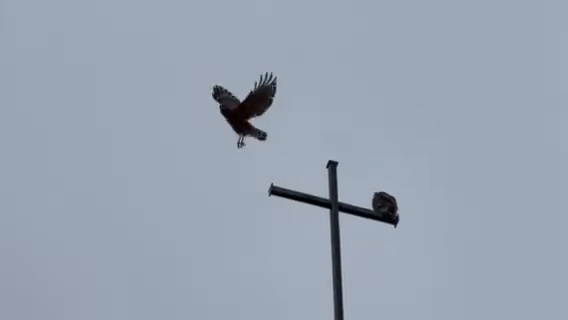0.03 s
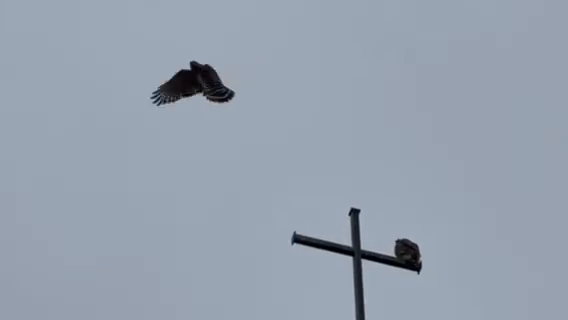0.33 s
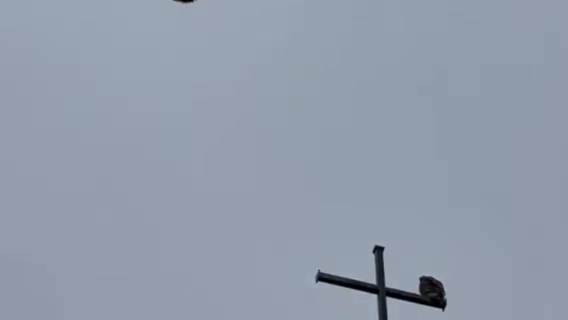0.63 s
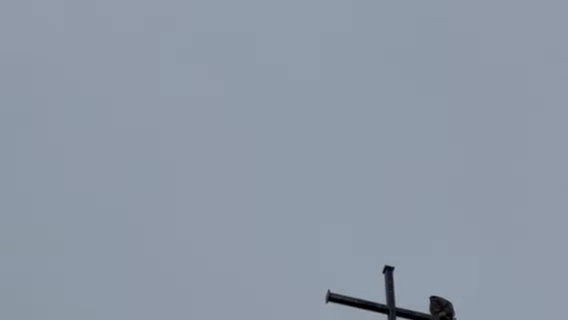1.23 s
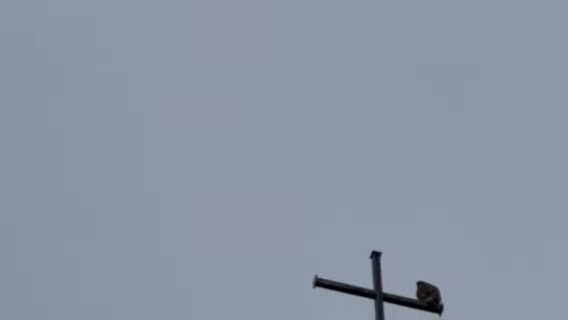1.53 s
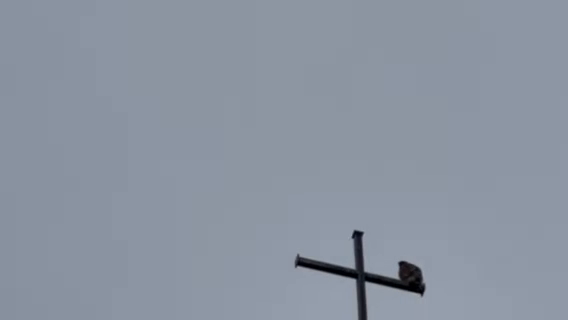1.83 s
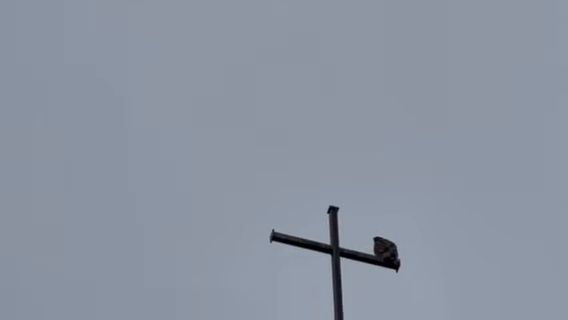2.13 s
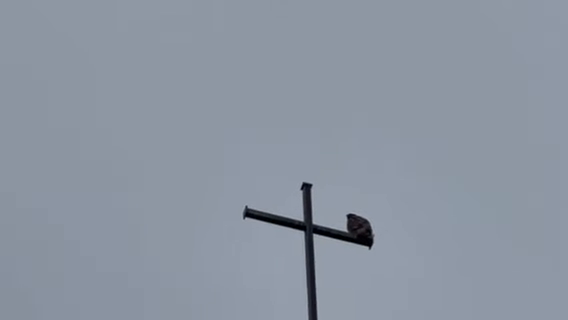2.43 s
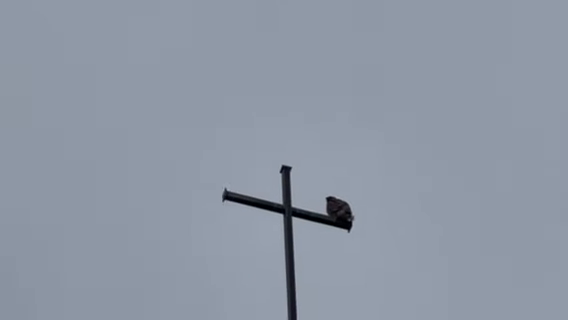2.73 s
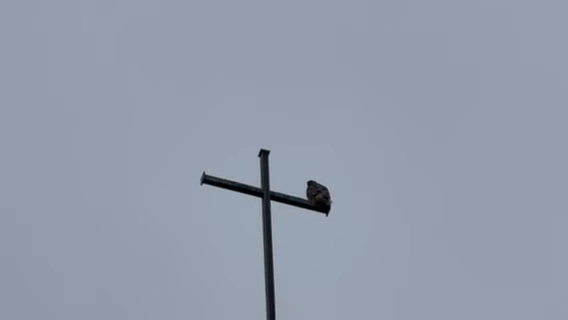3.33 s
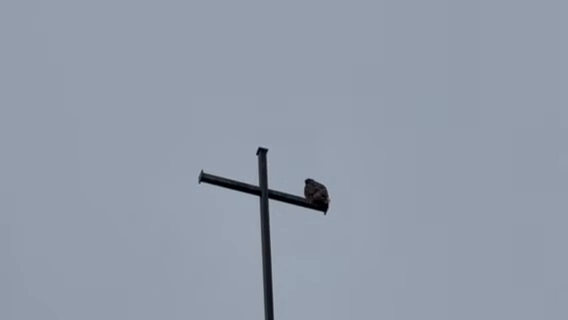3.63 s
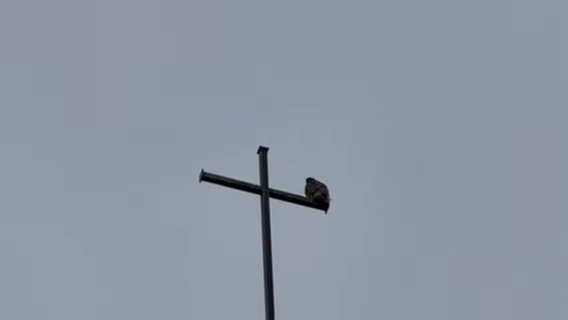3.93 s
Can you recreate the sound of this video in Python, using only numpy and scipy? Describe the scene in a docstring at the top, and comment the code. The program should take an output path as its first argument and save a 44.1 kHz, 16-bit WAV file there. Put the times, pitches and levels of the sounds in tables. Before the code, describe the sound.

Outdoors near a road, a hawk lets out one short, raspy, descending cry. Afterwards gusts buffet the microphone and a few faint chirps sound, while the low hum of traffic grows as a car passes.

```python
"""Outdoors near a road, a hawk overhead gives one harsh, falling scream.
Its voice is a stack of harmonics (multiples of one pitch) that turns hoarse and breaks lower.
Tyres wash in the distance and one car swells past; engines drone low under it.
Wind buffets the microphone, and small birds chirp faintly, far away."""
import sys
import numpy as np
from scipy import signal
from scipy.fft import rfft, irfft
from scipy.io import wavfile

SR = 44100
rng = np.random.default_rng(int(sys.argv[2]) if len(sys.argv) > 2 else 0)


def persist_wave(psi):
    """Save psi, clipped to +-1, as 16-bit WAV."""
    counts = np.round(np.clip(psi, -1, 1) * 32767).astype(np.int16)
    wavfile.write(sys.argv[1], SR, np.atleast_2d(counts).T)


N = 176400
T = np.arange(N) / SR
HZ = np.fft.rfftfreq(N, 1 / SR)


def amp(db):
    """Turns decibels into a gain."""
    return 10 ** (np.asarray(db) / 20)


def over_time(points):
    """Joins (time [s], value) rows with straight lines."""
    return np.interp(T, *np.transpose(points))


def over_frequency(points):
    """Joins (frequency [Hz], value) rows, giving each octave equal room."""
    hz, value = np.transpose(points)
    return np.interp(np.log(HZ + 1), np.log(abs(hz) + 1), value)


def drift(rate_hz):
    """A smooth random wobble of typical size 1, up to about the given rate."""
    wobble = irfft(rfft(rng.standard_normal(N)) * np.exp(-(HZ / rate_hz) ** 2), N)
    return wobble / np.sqrt(np.mean(wobble ** 2) + 1e-20)


def angle(hz):
    """How far a vibration has turned (its phase), in radians."""
    return 2 * np.pi * np.cumsum(hz * np.ones(N)) / SR


def tone(phase):
    """A pure tone of average power 1."""
    return np.sqrt(2) * np.sin(phase)


def gate(start, end, fade_s):
    """Fades a sound in and out between two times."""
    return np.clip(np.minimum(T - start, end - T) / fade_s, 0, 1)


# how alike left and right sound, capped at 1 when used (frequency [Hz], likeness)
LIKENESS = [(40, 1), (120, 0.5), (200, 0.8), (450, 0.52), (650, 0.6), (1300, 0.6), (1700, 0.52),
            (2400, .95), (4800, 0.8), (5600, 1.4), (8800, 1.3), (10000, 1.3)]
# how much louder the left side is (frequency [Hz], left minus right [dB])
LEFT_LOUDER = [(60, -0.41), (110, 2.1), (190, 1.8), (350, 0.61), (620, 1.4), (1110, 0.96), (1990, 0.92),
               (3560, -0.16), (6370, 0.094), (11400, 0.25)]
# how far the left side is ahead for nearer sounds (frequency [Hz], lead [radians])
NEAR_LEAD = [(30, 0.34), (280, 0.2), (650, 0.29), (900, 1.3), (1550, 1.05), (2300, .55), (3300, .65),
             (5500, 0)]
def stereo_noise(colour, left_lead=NEAR_LEAD):
    """Noise of a given tone colour at the microphone's two openings, scaled to a standard level."""
    left, other = rfft(rng.standard_normal((2, N))) * amp(over_frequency(colour))
    same = np.clip(over_frequency(LIKENESS), 0, 1)
    lead = over_frequency(left_lead)
    right = same * left + np.sqrt(1 - same ** 2) * other
    right = right * np.exp(-1j * lead) / amp(over_frequency(LEFT_LOUDER))
    pair = irfft(np.array([left, right]) / np.sqrt(1.17 + same * np.cos(lead)), N)
    return pair / pair.mean(0).std()


# far chirps (time [s], half length [s], pitch [Hz], level [dB])
CHIRPS = [(.9, .07, 4850, -68), (1.12, .07, 6300, -70), (1.18, .035, 4150, -64), (1.385, .055, 5400, -65),
          (1.445, .02, 3950, -64)]
def small_birds():
    """Thin chirps, blurred by distance."""
    blur = 1 + .04 * drift(900)
    return sum(amp(db) * np.exp(-((T - s) / half_length) ** 2) * tone(angle(hz * blur))
               for s, half_length, hz, db in CHIRPS)


# tone colour of the tyres, the car and far engines (frequency [Hz], relative level [dB])
TYRE_COLOUR = [(140, -21), (230, -9), (265, -4.5), (320, -6.5), (480, -10), (690, -5), (790, -2.5),
               (940, -10.5), (1130, -9.5), (1690, -14), (2170, -16), (3100, -22.5), (4200, -27.5),
               (6500, -31.5), (8200, -32.5), (10300, -45.5), (11200, -41.5)]
CAR_COLOUR = [(130, -3.5), (175, 10), (205, 11.5), (250, 6), (330, -2), (450, 0), (700, -4), (1100, 5.5),
              (1550, 4.5), (2200, -12.5), (3400, -21), (5000, -37), (8000, -39.5), (11000, -58)]
RUMBLE_COLOUR = [(30, -30), (55, 3.5), (110, 1), (180, -1), (240, -14), (350, -31), (600, -53)]
# loudness of the tyres and the car (time [s], level [dB])
TYRE_LEVEL = [(0, -45.5), (.7, -43.5), (1.5, -43), (2.4, -43), (3.3, -41), (4, -42)]
CAR_LEVEL = [(0, -58.5), (1.6, -55), (2.5, -46.5), (3.1, -43.5), (3.6, -39.5), (4, -44)]
# how far the left side is ahead for the tyres (frequency [Hz], lead [radians])
TYRE_LEAD = [(30, -1.5), (280, 0.55), (520, 1.5), (900, 2.5), (1400, 2.1), (2000, -0.05), (3300, 0.63),
             (5500, 0), (8800, 0.5), (10000, -2.5)]
def traffic():
    """Steady tyre wash, one nearer car swelling past, and the rumble of far engines."""
    tyres = stereo_noise(TYRE_COLOUR, TYRE_LEAD) * amp(over_time(TYRE_LEVEL) + 0.48 * drift(12))
    car = stereo_noise(CAR_COLOUR) * amp(over_time(CAR_LEVEL) + 0.96 * drift(11))
    rumble = amp(-40.5) * stereo_noise(RUMBLE_COLOUR)
    return tyres + car + rumble


# how fast the passing engine fires (time [s], rate [Hz])
FIRING_RATE = [(1.3, 60.46), (1.55, 63.86), (1.75, 63.68), (2.05, 60.9), (2.7, 59.3), (3.35, 60.1),
               (3.8, 58.6), (4, 58)]
# its hums at two and three times that rate (time [s], level [dB])
DOUBLE_HUM = [(0, -59), (1.3, -49), (1.95, -38.5), (2.15, -31), (2.55, -42.5), (2.66, -28.5), (2.78, -26.5),
              (3.1, -35.5), (3.45, -27), (3.72, -23.5), (3.86, -40.5), (4, -30)]
TRIPLE_HUM = [(0, -63), (1.25, -53), (1.38, -35.5), (1.5, -36.5), (1.56, -54), (1.62, -51), (1.7, -37.5),
              (1.85, -30), (1.96, -34.5), (2.03, -32), (2.13, -48), (3.3, -38), (4, -41)]
# idling engines (pitch [Hz], rows of (time [s], level [dB]))
IDLE_DRONES = [(54, [(0, -54), (2.9, -39), (3.15, -31), (4, -33.5)]), (86, [(0, -55), (2.1, -43),
               (2.3, -34.5), (2.55, -40.5), (2.85, -32.5), (3.3, -30), (3.55, -46), (3.95, -30.5)]),
               (340, [(0, -68), (2.3, -59), (3, -53), (4, -52.5)])]
def engines():
    """A passing engine hums roughly over the drone of idling ones."""
    phase = angle(over_time(FIRING_RATE) * (1 + 0.005 * drift(15)))
    passing = amp(over_time(DOUBLE_HUM)) * tone(2 * phase)
    passing += amp(over_time(TRIPLE_HUM)) * tone(3 * phase)
    idling = np.zeros(N)
    for hz, swell in IDLE_DRONES:
        level = amp(over_time(swell) + 1.1 * drift(2.1))
        idling += level * tone(angle(hz * (1 + 0.0029 * drift(8.4))))
    roughness = amp(1.2 * drift(25))
    return passing * roughness + idling


# tone colour of the wind (frequency [Hz], relative level [dB])
WIND_COLOUR = [(20, -48), (32, -22), (48, 0), (62, 0.5), (100, 0), (150, -7), (200, -9), (250, -17.5),
               (330, -30), (600, -73)]
# its gusts (time [s], level [dB])
WIND_LEVEL = [(0, -53), (.52, -43), (.65, -36.5), (.76, -36.5), (1.05, -30), (1.25, -35.5), (1.7, -34),
              (2.15, -30.5), (2.42, -32), (2.62, -31), (2.95, -29), (3.2, -32.5), (3.7, -31), (4, -27.5)]
# thumps on the microphone (time [s], level [dB], pitch [Hz])
BUFFETS = [(0.657, -21.5, 69.6), (.828, -16.5, 81.5), (0.874, -18.5, 79.6), (.937, -22, 95),
           (0.97, -20.5, 80), (.999, -20, 148), (1.018, -26, 70), (1.089, -17.5, 122), (1.145, -17, 86),
           (1.789, -26, 72), (2.896, -14.5, 115), (2.908, -14.5, 65.16), (2.923, -17, 65),
           (3.093, -17.5, 65)]
def wind():
    """Lumpy rumble, with single swirls of air thumping the microphone."""
    out = stereo_noise(WIND_COLOUR) * amp(over_time(WIND_LEVEL) + drift(8))
    for s, db, hz in BUFFETS:
        cycles = (T - s) * hz
        # each swirl carries a smaller, quicker one
        push = np.cos(2 * np.pi * cycles) + amp(-13) * np.sin(2 * np.pi * 2.2 * cycles)
        out -= amp(db) * np.exp(-(cycles / 0.66) ** 2) * push
    return out


# the hawk's last note (time [s], pitch [Hz])
BREAK_PITCH = [(.585, 752), (.603, 731), (.62, 691), (.635, 639), (.65, 545)]
# its harmonics (multiple, start level [dB], end level [dB])
BREAK_HARMONICS = [(2, -51, -61), (3, -49.5, -55), (4, -59, -52.5), (5, -62, -66), (6, -63, -68)]
def voice_break():
    """The voice breaks to a lower, hoarse note that throbs and falls away."""
    span_s, throb_hz = (.584, .648), 64
    phase = angle(over_time(BREAK_PITCH) * (1 + .028 * drift(400)))
    throb_db = 3 * np.cos(2 * np.pi * throb_hz * (T - span_s[0]))
    voice = sum(amp(np.interp(T, span_s, ends_db)) * tone(round(k) * phase)
                for k, *ends_db in BREAK_HARMONICS)
    return gate(*span_s, fade_s=.01) * amp(throb_db + 2 * drift(250)) * voice


# the scream's second harmonic (time [s], level [dB])
RING_LEVEL = [(.324, -57), (.332, -45), (.349, -44.5), (.36, -38), (.372, -36), (.384, -45), (.394, -36.5),
              (.412, -41.5), (.435, -51), (.466, -40), (.494, -43), (.503, -52), (.54, -49.5), (.578, -40),
              (.587, -52)]
def ring(phase, rasp):
    """A ringing tone at twice the scream's pitch, which briefly catches and stutters."""
    start, end, stutter_hz, depth_db = .494, .546, 76, 13
    dips = np.sin(np.pi * (T - start) * stutter_hz) ** 4
    stutter_db = depth_db * (T > start) * (T < end) * (.35 - dips)
    ringing = tone(2 * phase + .6 * rasp * drift(220))
    return amp(over_time(RING_LEVEL) + stutter_db) * ringing * (1 + rasp * drift(220))


def scratch():
    """The brief, high, noisy edge of the scream's hoarse part."""
    level = amp(-62) * np.exp(-((T - 0.51) / .035) ** 2)
    return level * drift(290) * tone(angle(5430 + 200 * drift(310)))


# the hawk's effort, which drives the upper harmonics (time [s], level [dB])
EFFORT = [(.294, -62), (.302, -44), (.313, -44), (.322, -49), (.333, -50), (.375, -50.5), (.41, -48.5),
          (.45, -52), (.57, -51), (.59, -60)]
# their levels on top of that (multiple, bright start [dB], full middle [dB], hoarse tail [dB])
HARMONICS = [(3, 1.5, -6.5, -5.5), (4, -3, -7.5, -9.5), (5, -3.5, -5.5, -15.5), (6, -13, -7.5, -15),
             (7, -12, -25, -32), (8, -27, -16.5, -26), (9, -13, -25, -40)]
def upper_harmonics(pitch, phase, rasp):
    """The opening scoop sounds through one narrow resonance; then the tone opens out and darkens."""
    resonance_hz, scoop_end_s, stages_s = 3250, .33, (.345, 0.37, 0.45)
    scoop = np.clip((scoop_end_s - T) / .005, 0, 1)
    effort = amp(over_time(EFFORT))
    out = np.zeros(N)
    for k, *stages_db in HARMONICS:
        k = round(k)
        octaves_away = np.log2(k * pitch / resonance_hz)
        muffle_db = scoop * np.minimum(85 * octaves_away ** 2 + 3, 40)
        level = effort * amp(np.interp(T, stages_s, stages_db) - muffle_db + 2 * drift(70))
        out += level * tone(k * phase + .5 * k * rasp * drift(480))
    return out


# strength of the flutter (time [s], level [dB])
FLUTTER_LEVEL = [(.41, -63), (.432, -52.5), (.485, -52), (.505, -64), (.55, -59), (.585, -61)]
# the tones it adds (harmonic, side [+1 above, -1 below], relative level [dB])
SIDE_TONES = [(2, 1, -1.5), (2, -1, -4), (3, 1, -15), (5, -1, -14)]
def flutter(phase):
    """A second vibration in the voice puts extra tones beside the harmonics."""
    flutter_phase = angle(405 * (1 + 0.069 * drift(118)))
    tones = sum(amp(db) * tone(round(k) * phase + np.sign(side) * flutter_phase)
                for k, side, db in SIDE_TONES)
    return amp(over_time(FLUTTER_LEVEL)) * tones


# a quick scoop up, then a long sag (time [s], pitch [Hz])
SCREAM_PITCH = [(.299, 758), (.313, 1046), (.322, 1143), (.328, 1220), (.338, 1234), (.365, 1205),
                (.402, 1142), (.45, 1114), (.493, 1102), (.555, 1065), (.581, 1043), (.588, 960)]
# the scream's lowest tone (time [s], level [dB])
LOWEST_LEVEL = [(.32, -62), (.342, -47), (.365, -51), (.388, -46), (.44, -52), (.47, -59), (.58, -60)]
def scream():
    """A whistle rich in harmonics starts clear and grows raspy as its pitch sags."""
    pitch = over_time(SCREAM_PITCH)
    phase = angle(pitch * (1 + 0.0032 * drift(260)))
    clear_db, hoarse_db = -21, -8
    rasp = amp(over_time([(0.38, clear_db), (0.67, hoarse_db)]))
    voice = ring(phase, rasp)
    voice += amp(over_time(LOWEST_LEVEL) + 2 * drift(60)) * tone(phase)
    voice += scratch() + upper_harmonics(pitch, phase, rasp) + flutter(phase)
    return voice * gate(.292, .59, fade_s=.004)


def hawk():
    """The call reaches the left side first, and scatters faintly off the surroundings."""
    lead_s, echo_db, echo_s = .00002, -17, 0.33
    call = scream() + voice_break()
    right = irfft(rfft(call) * np.exp(-2j * np.pi * HZ * lead_s), N)
    t = T[:SR]
    echo_shape = amp(-60 * t / echo_s) * np.minimum(t / 0.013, 1)
    common, apart = rng.standard_normal((2, SR)) * echo_shape
    tails = np.array([common + 0.43 * apart, common - 0.45 * apart]) / np.linalg.norm(common)
    echo = signal.fftconvolve(call[None], tails, axes=1)[:, :N]
    return np.array([call, right]) + amp(echo_db) * echo


def scene():
    """Birds, road and wind together."""
    return hawk() + small_birds() + traffic() + engines() + wind()


def record(dry):
    """The recorder cuts off the highest treble."""
    treble_cut = signal.firwin(401, 11450, window=("kaiser", 9), fs=SR)
    return signal.oaconvolve(dry, treble_cut[None], "same", axes=1)


dry = scene()
out = record(dry)
persist_wave(out)
```